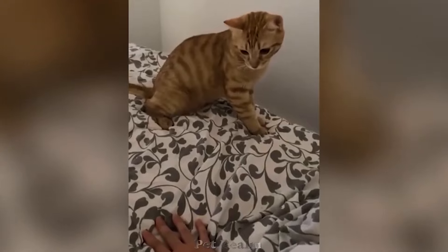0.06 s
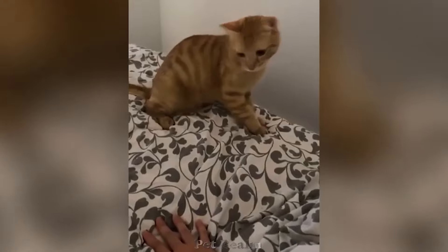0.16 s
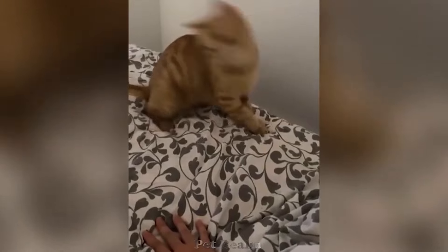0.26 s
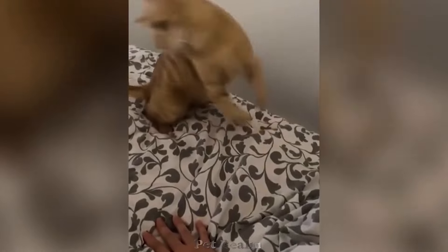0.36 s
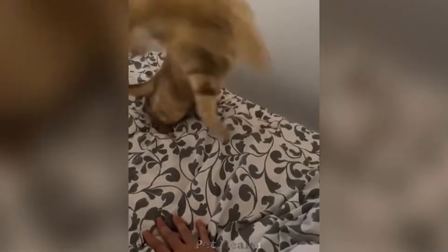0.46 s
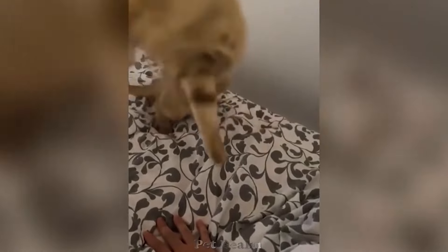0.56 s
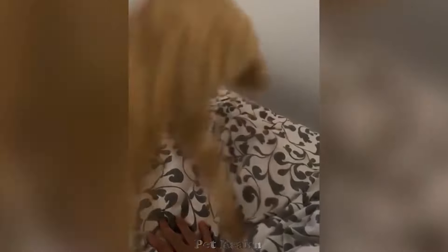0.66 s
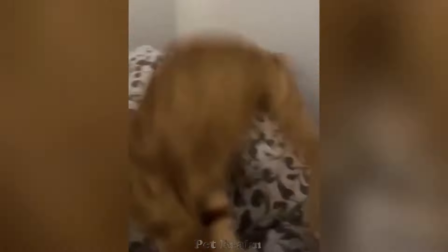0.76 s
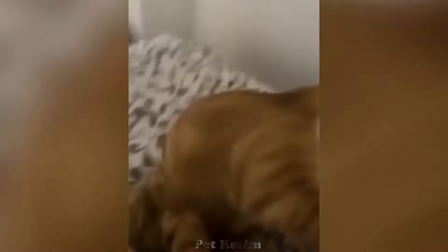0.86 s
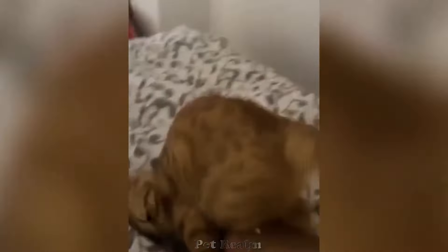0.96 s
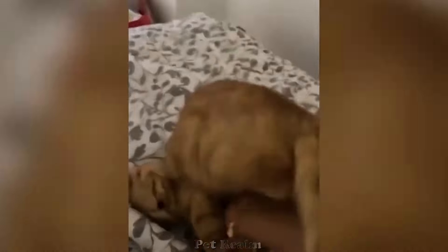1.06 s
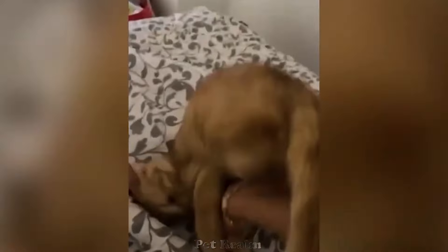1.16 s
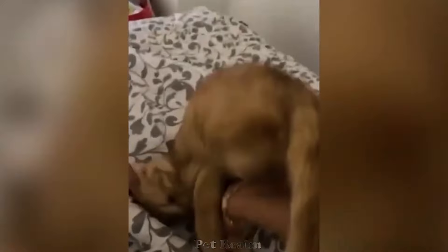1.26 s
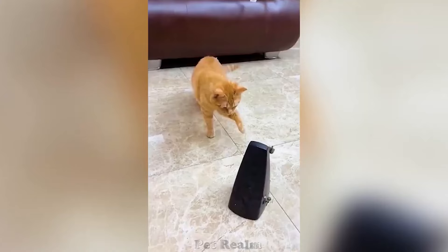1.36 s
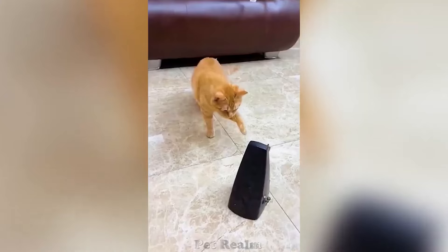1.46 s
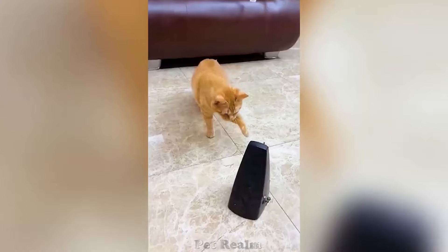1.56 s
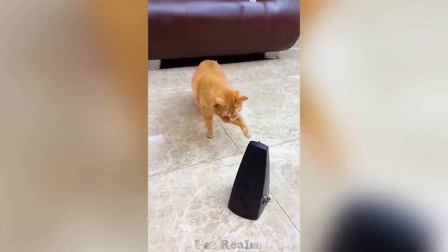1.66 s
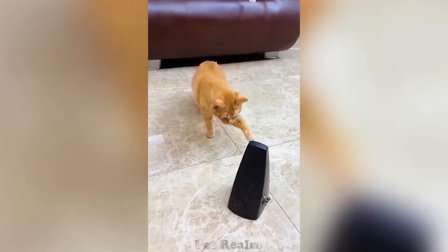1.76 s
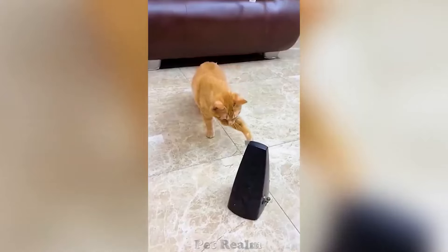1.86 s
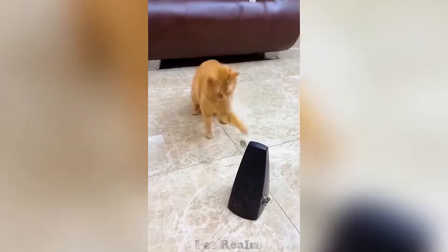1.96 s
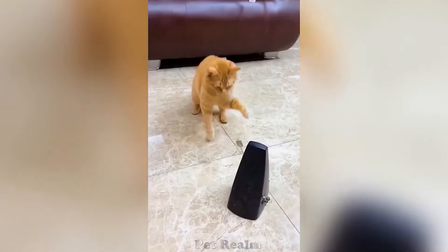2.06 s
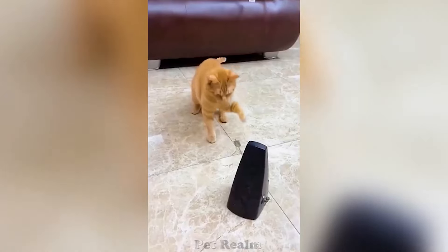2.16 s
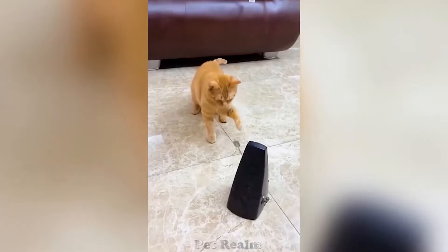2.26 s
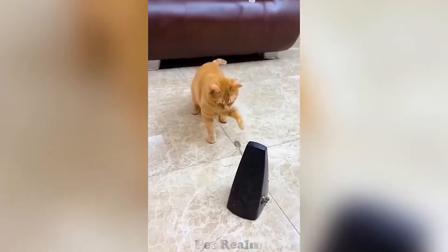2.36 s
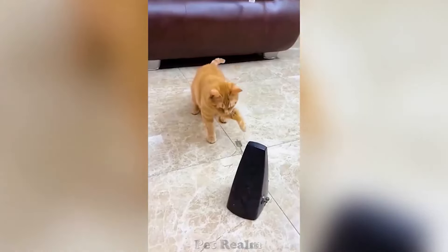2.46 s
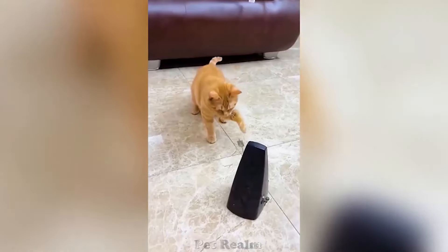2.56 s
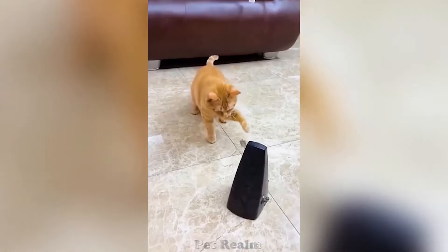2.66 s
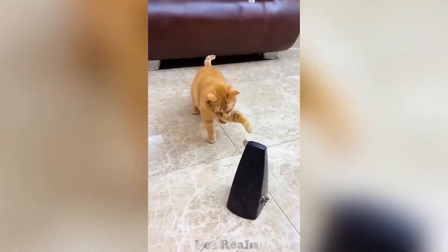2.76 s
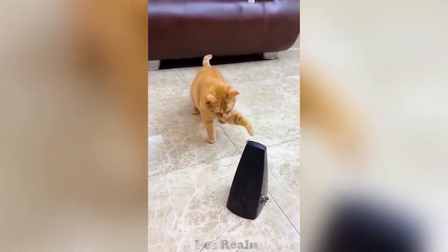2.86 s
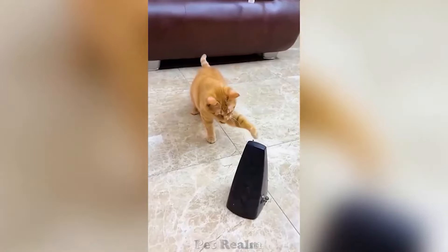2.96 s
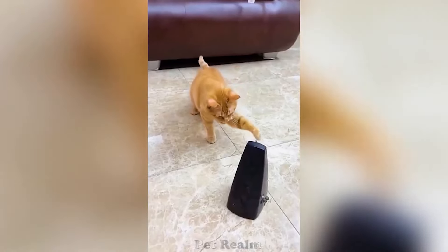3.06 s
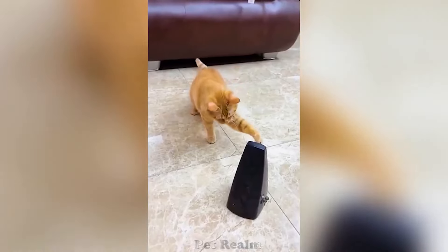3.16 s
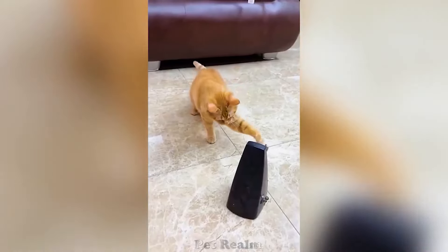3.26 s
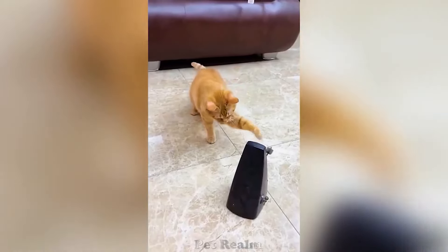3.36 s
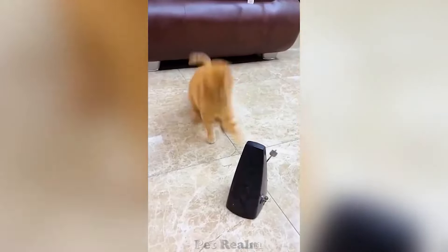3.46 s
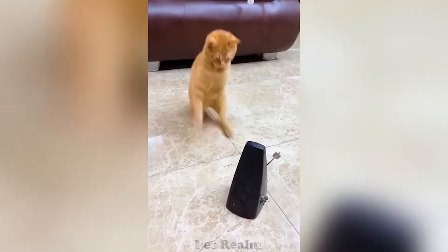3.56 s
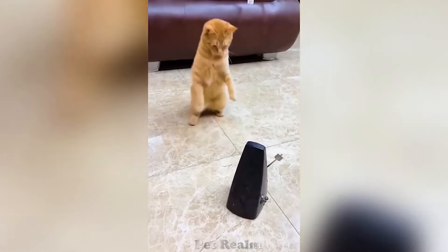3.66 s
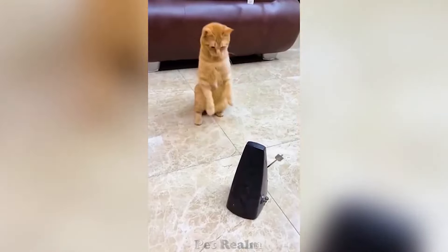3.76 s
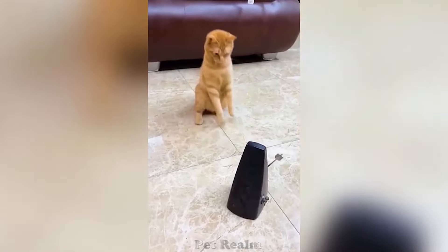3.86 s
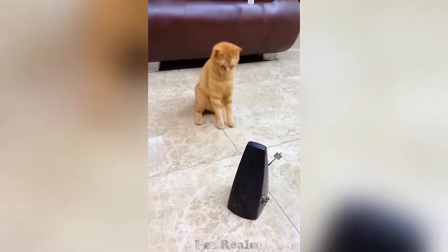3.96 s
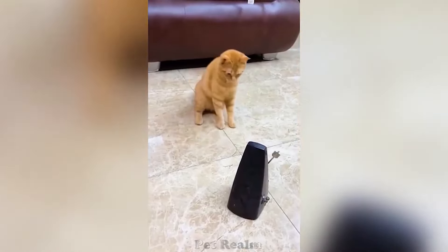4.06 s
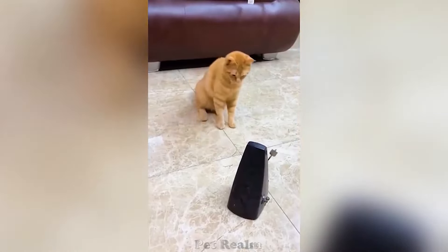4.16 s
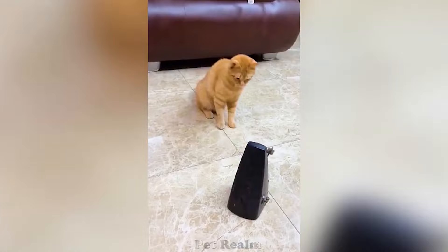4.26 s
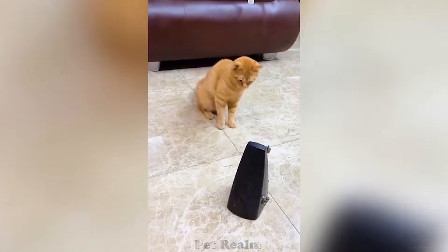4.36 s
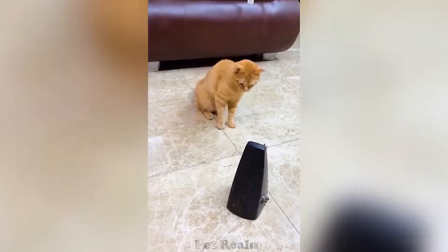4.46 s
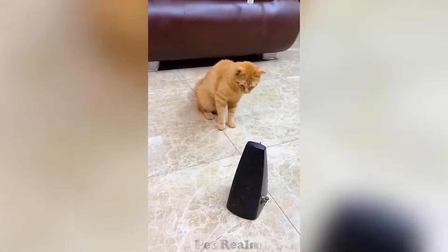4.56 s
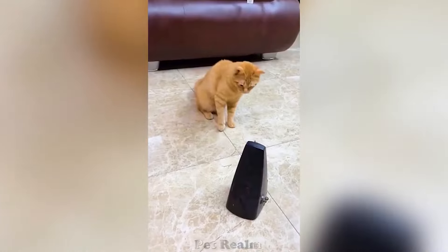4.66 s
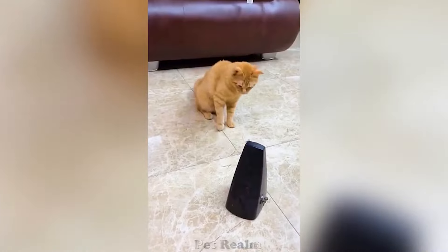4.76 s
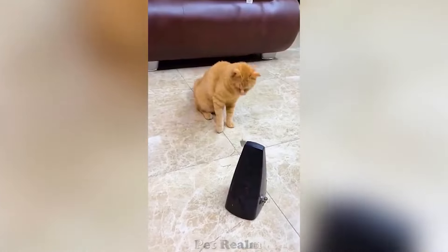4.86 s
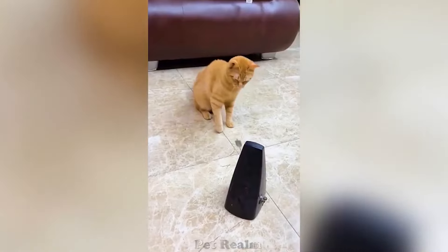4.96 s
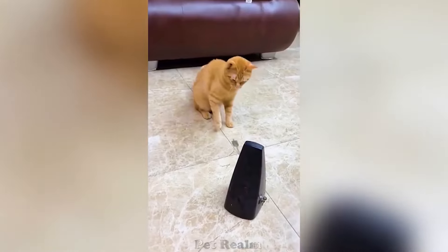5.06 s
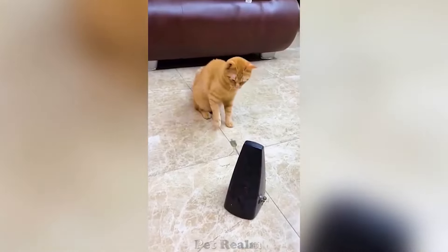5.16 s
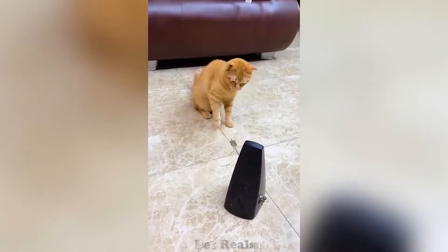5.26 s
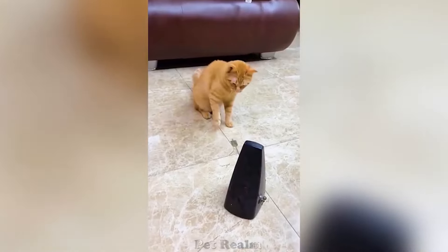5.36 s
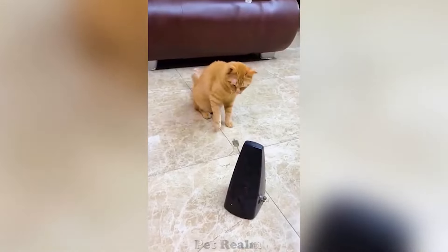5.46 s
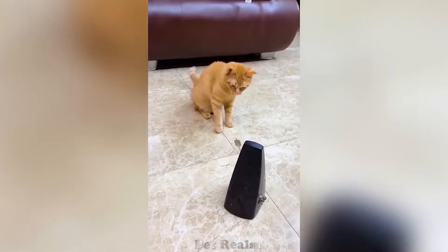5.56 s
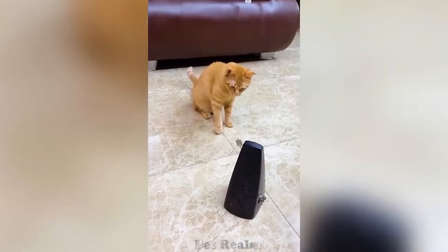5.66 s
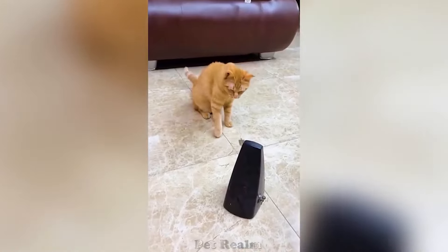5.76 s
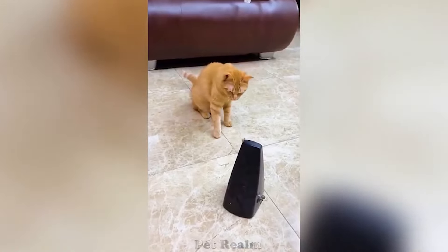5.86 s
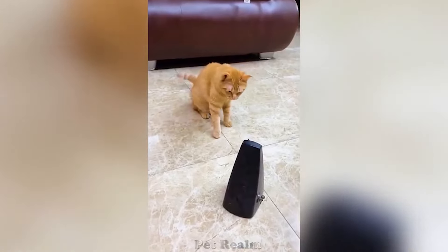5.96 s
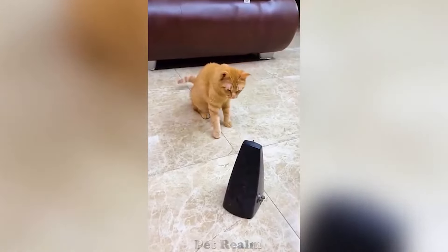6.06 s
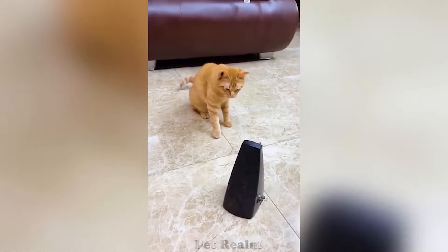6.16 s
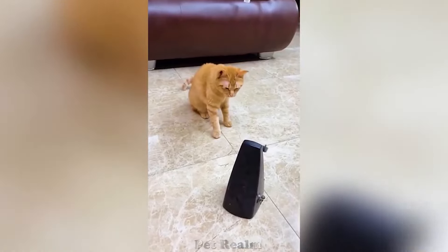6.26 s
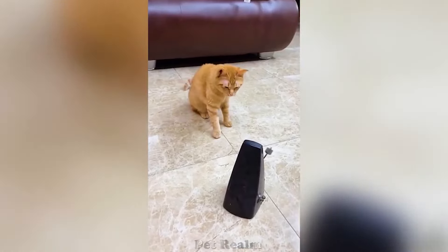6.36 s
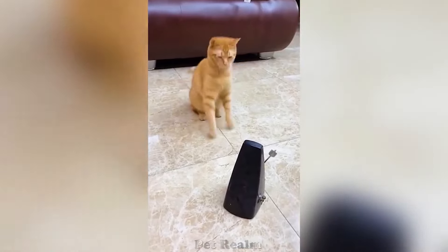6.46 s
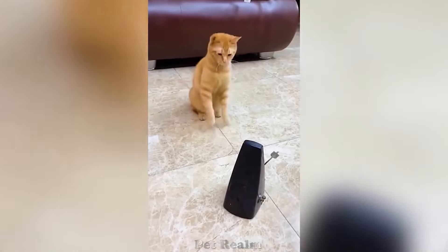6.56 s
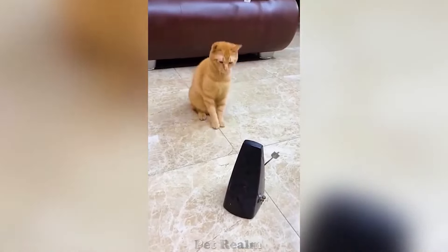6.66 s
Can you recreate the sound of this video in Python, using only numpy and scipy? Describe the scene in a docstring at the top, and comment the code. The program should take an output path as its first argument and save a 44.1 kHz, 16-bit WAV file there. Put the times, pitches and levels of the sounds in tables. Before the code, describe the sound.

A cat thumps onto a rustling duvet; then a mechanical metronome ticks slowly indoors, every second tick carrying a high, lingering bell ring.

```python
"""In a bedroom where a fan hums, a cat pounces onto a duvet: paws thump, the mattress shakes
and the cloth rustles. That scene fades out, and a living room opens with a low rumble of air.
There a pendulum metronome ticks slowly on the tiled floor. Its escapement (the catch that
stops and frees a toothed wheel) knocks the plastic case, and every second beat also strikes
a small bell, whose middle note lingers and throbs. Paws scuff faintly."""
import sys
import numpy as np
from scipy import signal
from scipy.fft import rfft, irfft, next_fast_len
from scipy.io import wavfile
from scipy.ndimage import map_coordinates

SR = 44100
rng = np.random.default_rng(int(sys.argv[2]) if len(sys.argv) > 2 else 0)


def wav_record(signal):
    """Record a signal, one row per channel, as 16-bit PCM in the file named by sys.argv[1]."""
    frames = np.transpose(np.atleast_2d(signal))
    bounded = np.clip(frames, -1, 1)
    # unit amplitude maps onto the largest positive 16-bit level
    quanta = np.round(bounded * 32767).astype(np.int16)
    wavfile.write(sys.argv[1], SR, quanta)


N = 296071


def amp(db):
    """Turn decibels into a gain."""
    return 10 ** (np.asarray(db) / 20)


def unit(x):
    """Scale a sound to an average strength (rms) of 1."""
    return x / np.sqrt(np.mean(x ** 2) + 1e-20)


def clock():
    """The time of every sample, in seconds."""
    return np.arange(N) / SR


def along(points, hz):
    """Read between (frequency, value) points on a pitch-like log scale."""
    frequencies, values = np.transpose(points)
    return np.interp(np.log(hz + 1), np.log(frequencies + 1), values)


def wobble(rate):
    """A smooth curve through `rate` random values a second."""
    return map_coordinates(rng.standard_normal(int(N * rate / SR) + 4), [np.arange(N) * rate / SR])


def noise(spectrum, size=N):
    """Noise of strength 1, shaped by (frequency, level) points."""
    padded = next_fast_len(size + 8192)
    gains = amp(along(spectrum, np.fft.rfftfreq(padded, 1 / SR)))
    return unit(irfft(rfft(rng.standard_normal(size), padded) * gains, padded)[:size])


def add(track, s, sound):
    """Mix a sound in, starting at s seconds."""
    part = track[max(round(s * SR), 0):][:len(sound)]
    part += sound[:len(part)]


# The fan's rushing air: (frequency [Hz], relative level [dB])
FAN_RUSH = [(15, -30.5), (25, -1), (128, -0.5), (167, -5.5), (301, -5.5), (415, -16.5), (573, -15),
            (655, -19.5), (729, -16.5), (1580, -25), (1720, -23), (2020, -25), (6200, -35.5), (11500, -52),
            (15000, -64)]
# The fan's hum: (pitch [Hz], relative level [dB])
FAN_TONES = [(301.5, -62), (565.2, -57.5), (1680, -72), (1728, -61.5), (1776, -61)]


def bedroom_fan(air_db=-43, hum_db=-3, waver=.5):
    """A fan pushes air and hums a few unsteady tones."""
    hum = np.zeros(N)
    for hz, db in FAN_TONES:
        phase = 2 * np.pi * hz * clock() + waver * wobble(17.1)
        hum += amp(db + hum_db) * np.sqrt(2) * np.sin(phase)
    return amp(air_db) * noise(FAN_RUSH) + hum


# The living room's rumble and hiss, both: (frequency [Hz], relative level [dB])
VENT_RUMBLE = [(25, -6.5), (44, 6), (62, -1), (82, 5.5), (115, -7), (140, 2), (175, -6.5), (205, -3.5),
               (290, -12.5), (560, -13), (1250, -16.5), (1700, -20.5), (2700, -29.5), (4500, -52.5),
               (8000, -100)]
AIR_HISS = [(1500, 2.5), (3000, 6), (4700, 2.5), (6000, -22), (7000, -7.5), (9500, -0.5), (11000, -13.5),
            (15000, -30)]


def living_room_air(rumble_db=-61, hiss_db=-79):
    """Ventilation rumbles softly under a thin hiss."""
    rumble = amp(rumble_db + 0.67 * wobble(5.4)) * noise(VENT_RUMBLE)
    return rumble + amp(hiss_db) * noise(AIR_HISS)


# How long the echo lasts: (frequency [Hz], fade time [s]). A fade time, or t60, is a fall of 60 dB.
ECHO_FADE = [(200, 0.57), (700, 0.53), (2000, 0.59), (5000, 0.59), (8000, 0.52), (14000, 0.35)]
# What the walls send back: (frequency [Hz], relative level [dB])
ECHO_COLOUR = [(200, 5.5), (600, 2), (1500, 5), (4000, 1.5), (8000, 1.5), (14000, 3)]


def room_echo(sound, gap_s=.009):
    """Sound bounces around the tiled room; each frequency dies at its own speed."""
    hz, t, spectrum = signal.stft(rng.standard_normal(SR * 3 // 4), SR, nperseg=256)
    level_db = along(ECHO_COLOUR, hz)[:, None] - 60 * t / along(ECHO_FADE, hz)[:, None]
    tail = signal.istft(spectrum * amp(level_db), SR, nperseg=256)[1]
    tail = np.pad(tail / np.linalg.norm(tail), (round(gap_s * SR), 0))
    return signal.fftconvolve(sound, tail)[:len(sound)]


# Paws scuffing the tiles: (time [s], level [dB], swell time [s], strongest frequency [Hz])
PAW_SCUFFS = [(1.656, -68.5, 0.0049, 3460), (2.441, -60, 0.043, 2800), (3.188, -70.5, 0.0065, 7500),
              (4.25, -80, 0.074, 3030), (6.034, -71.5, 0.023, 2500)]
# Thin squeaks: (time [s], level [dB], swell time [s], pitch [Hz])
THIN_SQUEAKS = [(5.534, -70.5, 0.044, 1691), (5.796, -61.5, 0.038, 1367)]
# The notes a light scrape sets ringing: (pitch [Hz], level [dB], fade time [s])
SCRAPE_NOTES = [(1530, -59, 0.19), (2050, -64, .45), (2340, -63, .35), (3358, -50, 0.25)]


def scuffs_and_squeaks(scrape_s=2.41, scrape_rise_s=0.011, echo_db=-2, waver=.6):
    """Soft scuffs, thin squeaks and one ringing scrape, blurred by the room."""
    out, t = np.zeros(N), clock()
    swell = lambda s, db, width: amp(db) * np.exp(-((t - s) / width) ** 2)
    tone = lambda hz: np.sin(2 * np.pi * hz * t + waver * wobble(40))
    for s, db, width, hz in PAW_SCUFFS:
        rub = noise([(hz / 8, -14), (hz / 2, -4), (hz, 0), (hz * 2, -16), (hz * 6, -38)])
        out += swell(s, db, width) * rub
    for s, db, width, hz in THIN_SQUEAKS:
        out += swell(s, db, width) * tone(hz)
    ring = sum(amp(db - 60 * t / t60) * tone(hz) for hz, db, t60 in SCRAPE_NOTES)
    add(out, scrape_s, ring * (1 - np.exp(-t / scrape_rise_s)))
    return out + amp(echo_db) * room_echo(out)


def press(s, hold_s, rise_db_per_s, fall_db_per_s):
    """A paw's push: a gain that rises up to time s, holds, then falls."""
    t = clock() - s
    return amp(rise_db_per_s * np.minimum(t, 0) - fall_db_per_s * np.maximum(t - hold_s, 0))


# The mattress's shudder and the duvet's rustle, both: (frequency [Hz], relative level [dB])
MATTRESS_SHAKE = [(13, -40), (22, 10.5), (53, 3), (155, -4), (289, -9.5), (330, -6), (474, -50.5),
                  (700, -35), (910, -56.5), (1540, -120)]
DUVET_RUSTLE = [(250, -25.5), (400, 2.5), (650, -7.5), (1150, -4.5), (2200, -9.5), (3500, -13.5),
                (5500, -15), (8000, -29), (12000, -33.5), (15500, -42.5)]
# Paws landing on the bed: (time [s], relative thump level [dB], thump pitch [Hz],
# thump fade time [s], mattress level [dB], cloth level [dB], slide length [s])
PAW_LANDINGS = [(0.711, -30, 126, 0.083, -30, -41, .012), (0.754, -13, 267, 0.02, -29.5, -42.5, 0.025),
                (0.844, -24.5, 194.6, 0.051, -29, -44, 0.0087), (0.856, -24, 60.8, 0.12, -30, -41, 0.06),
                (1.027, -23.5, 235, 0.037, -35, -45, 0.014), (1.084, -39, 69.7, 0.056, -41.5, -51.5, 0.029)]


def pounce(thump_rise_s=0.0027, slap_db=3, slap_t60=0.078):
    """Each paw thumps, shakes the mattress and slaps the duvet, which rustles as the paw slides."""
    out, shake, rustle = np.zeros((3, N))
    t = clock()[:SR // 4]
    for s, db, hz, t60, mattress_db, cloth_db, slide_s in PAW_LANDINGS:
        thump_gain = 2 * amp(db - 60 * t / t60) * (1 - np.exp(-t / thump_rise_s))
        add(out, s, thump_gain * np.sin(2 * np.pi * hz * t))
        slap_gain = amp(cloth_db + slap_db - 60 * t / slap_t60)
        add(out, s, slap_gain * noise(DUVET_RUSTLE, len(t)))
        # the mattress gives, then comes to rest
        sink = press(s, slide_s, rise_db_per_s=898, fall_db_per_s=129)
        shake = np.hypot(shake, amp(mattress_db) * sink)
        # the duvet is brushed just before the landing and relaxes after the slide
        brush = press(s, slide_s, rise_db_per_s=502, fall_db_per_s=127)
        rustle = np.hypot(rustle, amp(cloth_db) * brush)
    folds = amp(1.16 * wobble(250) + 0.6 * wobble(44.7))  # quick crumples, slower folds
    return out + shake * noise(MATTRESS_SHAKE) + rustle * unit(folds * noise(DUVET_RUSTLE))


# The notes a knock sets ringing in the case and its steel works, and at 9200 Hz in the bell: (pitch [Hz],
# relative level [dB], fade time [s])
CASE_NOTES = [(338.7, -21.5, 0.067), (440, -16, 0.023), (562.5, -11.5, 0.076), (755, -10, 0.039),
              (908, -7.5, 0.034), (1087, -6, 0.025), (1311.5, -11, 0.08), (1430, -2, 0.019),
              (1540, -3.5, 0.02), (1718, -4.5, 0.018), (1897, -10.5, 0.058), (2453, -7, 0.039),
              (2713, -1.5, 0.024), (3425, -3, 0.022), (3503, 1, 0.02), (3784, -5, .02), (4030, -9, 0.067),
              (4750, -1, 0.017), (5500, -33.5, .025), (7420, -16, 0.062), (8160, -14, 0.047),
              (9200, -15.5, .09)]
# The plastic's dry clack: (frequency [Hz], relative level [dB])
PLASTIC_CLACK = [(220, -25), (550, -6.5), (1400, 15), (2100, 16), (3800, -42), (5500, -10), (7000, -31.5),
                 (15000, -53)]


def case_knock(t, tilt, rise_s=0.0016, scatter_db=1.73, clack_db=-7, clack_t60=.05):
    """One knock makes the metronome's case clack and ring, never quite the same way twice."""
    hz, db, t60 = np.transpose(CASE_NOTES)[:, :, None]
    tilt_db = lambda f: tilt * np.log2(f / 2000)  # a negative tilt dulls the knock
    strength = amp(db + tilt_db(hz) + scatter_db * rng.standard_normal(hz.shape) - 60 * t / t60)
    facing = (-1) ** np.arange(len(CASE_NOTES))[:, None]  # neighbouring notes push the air opposite ways
    ring = (facing * strength * np.sin(2 * np.pi * hz * t)).sum(0)
    ring /= np.sqrt(np.mean(ring[:SR // 100] ** 2))  # strength 1 over the first 10 ms
    clack = noise([(f, level + tilt_db(f)) for f, level in PLASTIC_CLACK], len(t))
    clack *= amp(clack_db - 60 * t / clack_t60)
    return (ring + clack) * (1 - np.exp(-t / rise_s))


# Steel snapping against steel: (frequency [Hz], relative level [dB])
STEEL_SNAP = [(300, -26), (1200, 3), (4500, 2.5), (6500, -3.5), (7900, 0), (9000, -4), (12000, -10),
              (15000, -8.5), (16000, -30.5)]
# The metronome's beats: (time [s], level [dB], relative snap level [dB],
# relative rebound level [dB], treble tilt [dB per octave])
BEATS = [(1.8659, -23, 7.5, -8.5, -0.5), (3.3717, -24.5, 4.5, -7, -1), (4.8330, -23, 9, -8, -0.76),
         (6.3490, -25, 5, -10, -1)]


def ticks(snap_t60=0.053, snap_lag_s=0.001384, snap_rise_s=0.0006, rebound_s=.0105, echo_db=-6):
    """The catch drops on the toothed wheel, snaps into place and bounces once."""
    out, t = np.zeros(N), np.arange(SR * 3 // 4) / SR
    snap_shape = amp(-60 * t / snap_t60) * (1 - np.exp(-t / snap_rise_s))
    snap = lambda: snap_shape * noise(STEEL_SNAP, len(t))
    for s, db, snap_db, rebound_db, tilt in BEATS:
        beat = case_knock(t, tilt)
        add(beat, snap_lag_s, amp(snap_db - 7) * snap())
        rebound = amp(-5) * case_knock(t, tilt) + amp(snap_db - 3) * snap()  # less case, more steel
        add(beat, rebound_s + .0004 * rng.standard_normal(), amp(rebound_db) * rebound)
        add(out, s, amp(db) * (beat + amp(echo_db) * room_echo(beat)))
    return out


# The bell's five notes: (pitch [Hz])
BELL_PITCHES = [1978, 4011, 5033.1, 9130.1, 13953.4]
# How each note rings with its slightly higher twin:
# (relative level [dB], fade time [s], swell time [s], throb rate [Hz], twin strength [ratio])
BELL_NOTES = [(-52.5, 1.4, 0.032, 16, 1), (-61.5, 0.68, .01, 9, .3), (-47.5, 10.83, 0.094, 1.108, 0.36),
              (-29.5, 2.25, 0.15, 1.6, 0.083), (-26.5, 0.7, 0.13, 3, 0.54)]
# Hammer strikes; the first falls before the living room opens, leaving its middle note ringing:
# (time [s], level [dB], high-note boost [dB], early high-note flare [dB], case boom level [dB])
BELL_STRIKES = [(.33, 0, -45.5, 0, -60), (3.376, 0, 3.5, 5.5, -32.5), (6.353, -0.5, 2.5, 13.5, -30)]


def bell(flare_s=0.039, flare_width_s=0.042, flutter_db=3.5, settle_s=0.17, boom_hz=333, boom_t60=0.2):
    """Twin tones throb as they drift in and out of step; their level flutters just after a strike."""
    out = np.zeros(N)
    for s, db, high_db, flare_db, boom_db in BELL_STRIKES:
        t = np.arange(N - round(s * SR)) / SR
        bright_db = high_db + flare_db * np.exp(-((t - flare_s) / flare_width_s) ** 2)
        for hz, (note_db, t60, swell_s, throb_hz, twin) in zip(BELL_PITCHES, BELL_NOTES):
            is_high = hz > 7000
            pair = np.sin(2 * np.pi * hz * t) - twin * np.sin(2 * np.pi * (hz + throb_hz) * t)
            shimmer = 2 * is_high * wobble(700)  # the high notes shimmer roughly just after each strike
            flutter = (flutter_db * wobble(70) + shimmer)[:len(t)] * np.exp(-t / settle_s)
            level_db = db + note_db + flutter + bright_db * is_high - 60 * t / t60
            add(out, s, amp(level_db) * (1 - np.exp(-t / swell_s)) * pair)
        # the hammer's recoil booms in the hollow case
        boom_gain = amp(boom_db - 60 * t / boom_t60) * (1 - np.exp(-t / 0.014))
        add(out, s, boom_gain * np.sin(2 * np.pi * boom_hz * t))
    return out


def cut_bass(sound, low_hz=35):
    """Take away the deepest bass."""
    return signal.sosfilt(signal.butter(8, low_hz, "high", fs=SR, output="sos"), sound)


def scene(fade_at_s=1.135, open_at_s=1.407, drop_db_per_s=5000, fade_db_per_s=550):
    """The bedroom drops in level and dies away; after a short silence the living room opens."""
    t = clock()
    fading_s = np.maximum(t - fade_at_s, 0)
    drop_db = np.maximum(-drop_db_per_s * fading_s, -20)
    fade_out = amp(drop_db - fade_db_per_s * fading_s)
    fade_in = np.clip((t - open_at_s) / 0.00041, 0, 1)
    metronome = ticks() + bell()
    bedroom = cut_bass(bedroom_fan() + pounce())
    living_room = cut_bass(metronome + scuffs_and_squeaks() + living_room_air())
    return (fade_out * bedroom + fade_in * living_room)[None]


def record(dry):
    """Take away the highest treble, above 15450 Hz."""
    return signal.sosfilt(signal.cheby1(14, .1, 15450, fs=SR, output="sos"), dry)


dry = scene()
out = record(dry)
wav_record(out)
```